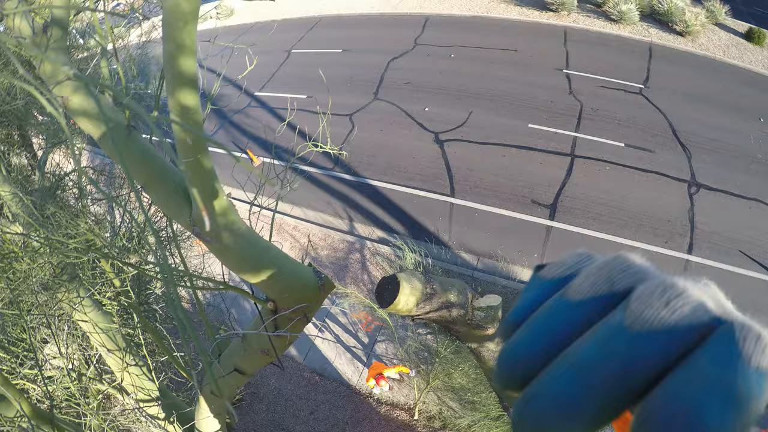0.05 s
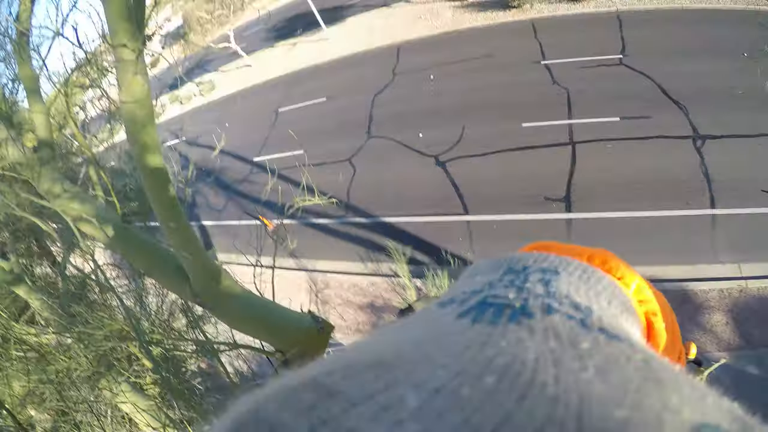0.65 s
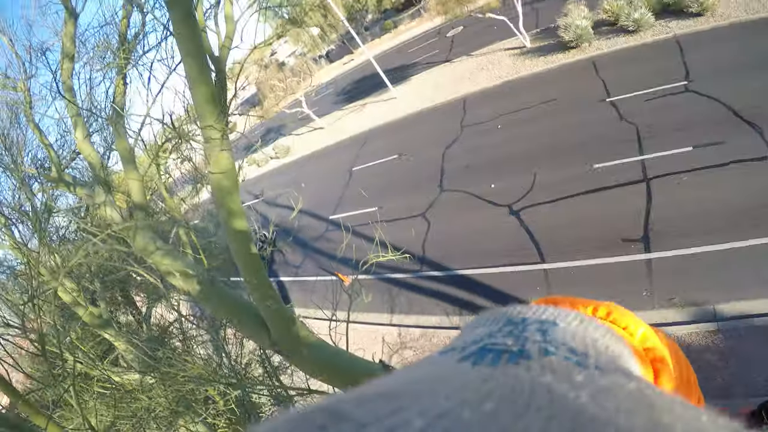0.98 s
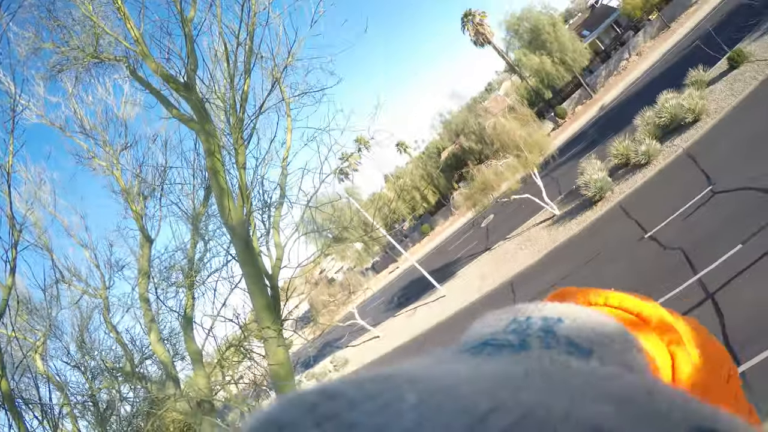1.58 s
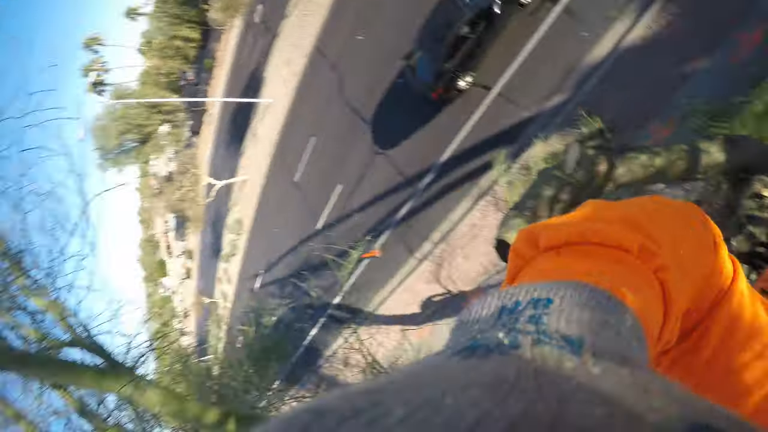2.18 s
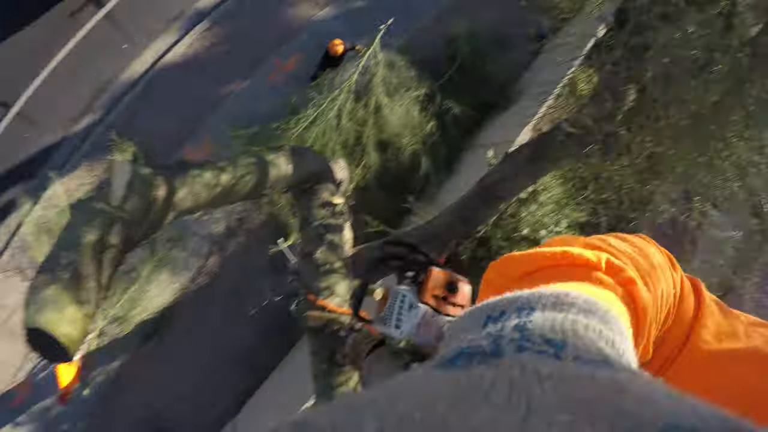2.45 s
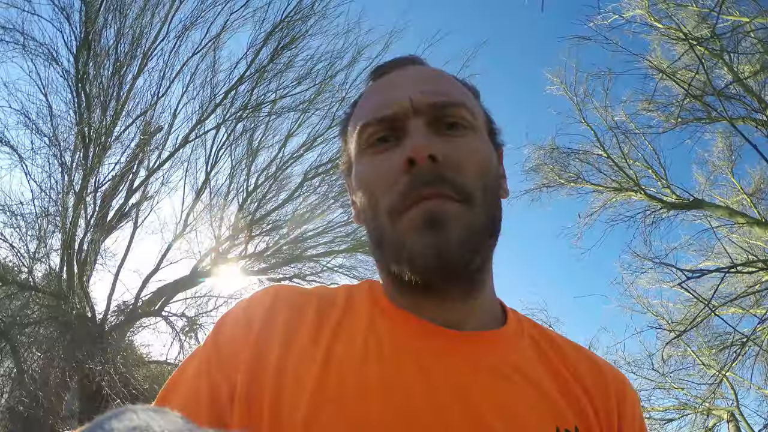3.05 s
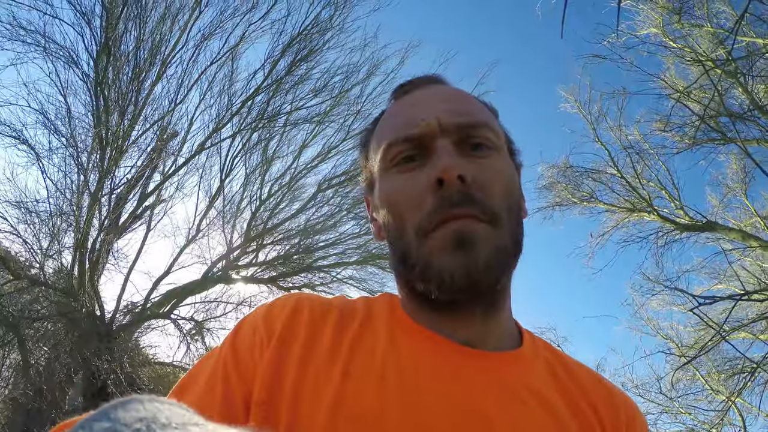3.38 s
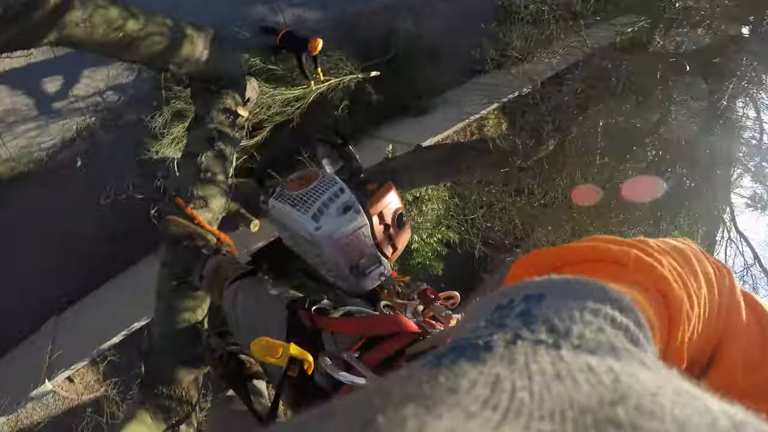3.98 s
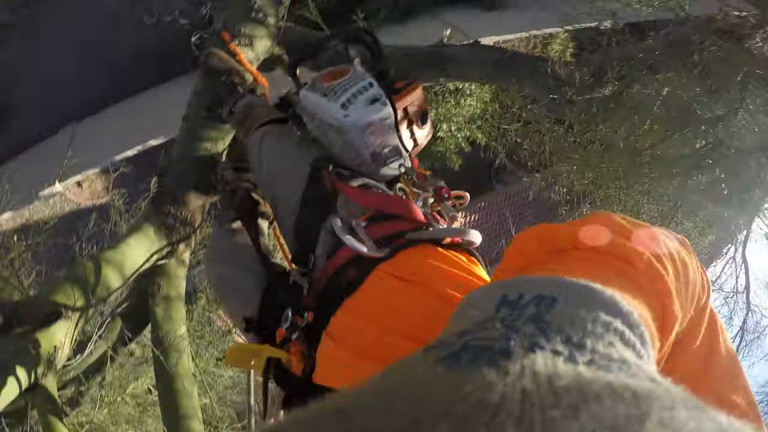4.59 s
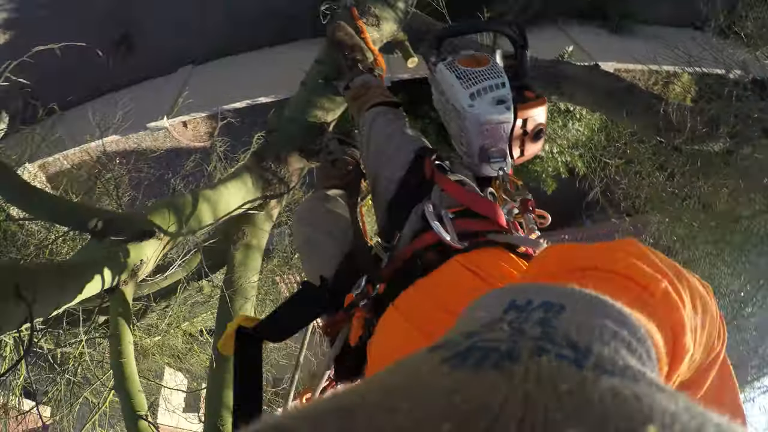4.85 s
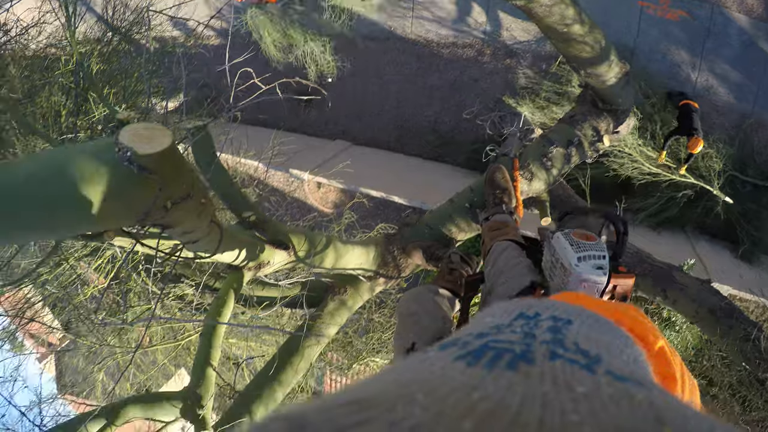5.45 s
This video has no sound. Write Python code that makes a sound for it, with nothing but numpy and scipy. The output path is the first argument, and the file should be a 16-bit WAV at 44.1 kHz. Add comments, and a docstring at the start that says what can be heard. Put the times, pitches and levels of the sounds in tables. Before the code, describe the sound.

Close handling noise from a handheld camera: a knit glove scrapes across the plastic housing amid irregular low bumps and small taps. A loud knock and short creak come midway, followed by scattered clicks, a quick zipping scuff with a swell of air, and one more strong thump. Soft cloth rustle and a building grip rumble finish it, all over faint outdoor traffic hum.

```python
"""A gloved hand turning a camera

High in a tree beside a road, a hand turns a small camera around. Bumps shake the mount and make it
thump and creak, the plastic housing clicks, and the knit glove rubs and zips over it. Clothes rustle,
air sways and distant traffic hums underneath. The hardest knocks overload the microphone."""
import sys
import numpy as np
from scipy import signal
from scipy.fft import rfft, irfft, next_fast_len
from scipy.io import wavfile
from scipy.ndimage import uniform_filter1d, map_coordinates

SR = 44100
rng = np.random.default_rng(int(sys.argv[2]) if len(sys.argv) > 2 else 0)


def unload_audio(sound):
    """Save the sound as a 16-bit wav file, at the path given as the first command line argument."""
    columns = np.transpose(np.atleast_2d(sound))
    # keep every value between -1 and 1, then stretch to whole-number steps
    steps = np.round(np.clip(columns, -1, 1) * 32767)
    wavfile.write(sys.argv[1], SR, steps.astype(np.int16))


N = 243431

# Soft bumps on the mount: t/s, level/dB, pitch of the push f/Hz, ringing relative to the push/dB
MOUNT_BUMPS = [(0.192, -9.5, 59, -24), (0.554, 0, 97.5, -2), (0.57, -6.5, 103, -4), (0.593, -9, 81, -30),
               (0.747, -17.5, 78.5, -9), (0.934, -12.5, 96, -1.5), (1.037, -12.5, 68, -12),
               (1.173, 0, 68.4, -7.5), (1.374, -7.5, 87, -3.5), (1.417, -1, 104, -10),
               (1.665, -6, 75, -11.5), (1.977, -11, 107, -8.5), (2.526, -9.5, 101, -5.5),
               (2.58, -15, 90, -5), (2.686, 4.5, 80.4, -11.5), (3.06, -13.5, 68.4, -19),
               (3.077, -11.5, 71.5, -7.5), (3.461, -23, 112, -8.5), (3.723, -8.5, 57.4, -37),
               (3.812, 1, 33, -38), (3.955, -16, 67.6, -5), (4.327, 2, 69, -11.5), (4.533, -18.5, 94, -6),
               (4.864, -25, 117, -3)]
# The tones the plastic housing rings at: f/Hz, level/dB, time to fade by 60 dB/s
HOUSING_TONES = [(356, -14.5, 0.021), (857, -10.5, 0.049), (970, 2, 0.01), (1270, -1, 0.0072),
                 (1300, -1, 0.034), (1767, -3.5, 0.031), (1969, -12, 0.054), (2277, -14, 0.053),
                 (2495, -6.5, 0.046), (2674, -1, 0.028), (2836, -8, 0.036), (3117, -7, 0.028),
                 (3784, -0.5, 0.02), (4050, -1.5, 0.022), (4684, -2, 0.036), (5080, 3.5, 0.02),
                 (5650, -2, 0.02), (6660, 0, 0.012), (7200, 10.5, 0.013), (9790, 24, 0.0026)]
# How briskly the arm carries the camera through the air: t/s, level/dB
ARM_MOTION = [(0.0, -43.5), (0.14, -45.5), (0.26, -35.5), (0.71, -26.5), (1.0, -38), (1.15, -43),
              (1.51, -29.5), (2.21, -36.5), (2.69, -30.5), (2.95, -32), (3.17, -45), (3.53, -42),
              (3.83, -19), (4.0, -41.5), (4.44, -32.5), (4.61, -42.5), (4.83, -43.5), (5.52, -34.5)]


def bumps():
    """Each bump is one swing of pressure, after which the mount rings briefly."""
    mount_hz, fade_s, lead_s = 108, .15, .05
    out = np.zeros(N)
    t = np.arange(SR // 4) / SR - lead_s
    after = np.maximum(t, 0)
    onset = 1 - np.exp(-(after / 0.0049) ** 2)
    ring = -np.cos(2 * np.pi * mount_hz * after) * amp(-60 * after / fade_s) * onset
    for start, db, push_hz, ring_db in MOUNT_BUMPS:
        push = -np.cos(2 * np.pi * push_hz * t) / np.cosh(t * push_hz / 0.39) ** 2.39
        add(out, start - lead_s, amp(db) * (push + amp(ring_db) * ring))
    return out


def clicks():
    """Each tap rings the housing's tones at new strengths; a soft tap leaves out the high ones."""
    # Taps on the housing, with a few faint buckle ticks among them (near 4.12, 5.10 and 5.31 s): t/s, relative
    # level/dB, treble limit f/Hz, tone of the touched spot f/Hz
    taps = [(0.177, -38, 900, 800), (0.263, -37.5, 4200, 3900), (0.378, -24, 1790, 860),
            (0.506, -32, 2600, 2600), (1.082, -23.5, 800, 800), (1.109, -14, 650, 950),
            (1.126, -29, 2580, 2780), (1.3984, -9, 1590, 930), (1.4022, -11.5, 1580, 1800),
            (1.454, -34.5, 4000, 4770), (1.968, -25, 730, 830), (2.3248, -18.5, 1870, 845),
            (2.4961, -21.5, 2140, 830), (2.531, -20.5, 1300, 1250), (2.542, -20.5, 1770, 2600),
            (2.6568, -19, 2900, 2290), (2.685, 1, 4040, 3060), (2.6872, -5, 2600, 2390),
            (2.6908, -8.5, 2550, 1330), (2.704, -11, 3500, 2350), (2.84, -23, 1300, 950),
            (2.876, -38, 9000, 7000), (2.8877, -18, 5870, 1670), (2.9212, -12.5, 2830, 1320),
            (3.1163, -9, 8600, 4000), (3.1174, -10.5, 2130, 2580), (3.129, -16, 4520, 2700),
            (3.139, -27, 3550, 2590), (3.264, -10.5, 8000, 1500), (3.2886, -16, 5500, 3870),
            (3.7092, -13.5, 3500, 1310), (3.7214, -13.5, 2800, 1820), (3.833, -22.5, 2300, 1820),
            (4.039, -36.5, 1200, 710), (4.0715, -30.5, 1400, 910), (4.092, -41, 4000, 2600),
            (4.1157, -44, 4900, 4600), (4.359, -29.5, 1820, 1300), (4.459, -19.5, 1870, 1420),
            (4.5135, -23, 1310, 1300), (4.8564, -31, 780, 400), (5.097, -45.5, 5000, 4800),
            (5.1376, -36, 840, 860), (5.2186, -25, 1690, 790), (5.313, -46, 5000, 4800),
            (5.3685, -32.5, 690, 930)]
    # Tone colour of the noisy crack: f/Hz, level/dB
    crack_colour = [(100, -33), (300, -12.5), (550, -11.5), (900, 1.5), (4000, 3), (9000, 0.5),
                    (15000, -12)]
    out, t = np.zeros(N), np.arange(SR // 10) / SR
    hz, tone_db, fade_s = np.transpose(HOUSING_TONES)[:, :, None]
    for start, db, hard_hz, spot_hz in taps:
        strength, detune, phase = rng.standard_normal((3, len(HOUSING_TONES), 1))
        tones = np.sin(2 * np.pi * hz * (1 + 0.011 * detune) * t + np.pi * phase)
        tones *= amp(tone_db + 2 * strength - 60 * t / fade_s)
        crack = coloured(rng.standard_normal(len(t)), crack_colour)
        crack *= amp(9 - 60 * t / 0.012) + amp(-2.5 - 60 * t / 0.055)  # a snap and a softer tail
        blow = (tones.sum(0) + crack) * (1 - np.exp(-t / 0.0004))
        softness = lambda f: 1 / (1 + 1j * f / hard_hz) ** 2 / (1 + (f / (3.4 * hard_hz)) ** 4)
        spot = lambda f: 1 + 2 / (1 + 1j * (f - spot_hz) / (0.16 * spot_hz))
        add(out, start, amp(db - 19) * unit(filtered(blow, lambda f: softness(f) * spot(f))))
    return out


def zips():
    """The ribs of the knit pluck an edge, mostly slowing as they go; the scuffing rings the housing."""
    # Slides over an edge: t/s, length/s, level/dB, first rib rate/Hz, last rib rate/Hz, roughness/0-1
    edge_slides = [(0.594, 0.06, -32, 3950, 3880, 0.35), (0.594, 0.062, -34.5, 5300, 5050, .6),
                   (0.711, 0.021, -32, 5200, 4750, 0.45), (0.718, 0.028, -25.5, 1272, 930, 0.45),
                   (2.495, 0.053, -35, 853, 916, 0.23), (2.72, 0.018, -38, 5050, 4980, 0.25),
                   (2.745, 0.064, -35.5, 3950, 3920, 0.3), (2.776, 0.008, -28, 4350, 4200, 0.2),
                   (3.704, 0.01, -29, 5200, 5000, 0.45), (3.72, 0.0153, -24, 3040, 1800, .8),
                   (3.786, 0.026, -25, 1650, 950, 0.7), (3.791, 0.018, -22, 5330, 4900, .7),
                   (3.8565, .0175, -13, 6000, 950, 0.1), (3.857, 0.013, -15, 4700, 3100, 0.8)]
    bite_s, stop_s = 0.003, 0.008
    out, size = np.zeros(N), SR // 8
    for start, length, db, first_hz, last_hz, rough in edge_slides:
        progress = np.minimum(np.arange(size) / SR / length, 1)
        rib_hz = last_hz + (first_hz - last_hz) * np.exp(-progress / 0.17)
        phase = 2 * np.pi * np.cumsum(rib_hz + 900 * rough * wobble(2500, size)) / SR
        ribs = through_housing(np.sin(phase) + 0.087 * np.sin(2 * phase), width_hz=70, direct=0.25)
        # A faster slide scuffs more brightly: f/Hz, level/dB
        scuff_colour = [(300, -24), (.5 * last_hz, -7), (last_hz, 0), (1.11 * last_hz, -3),
                        (2 * last_hz, -17), (5 * last_hz, -34)]
        scuff = coloured(rng.standard_normal(size), scuff_colour)
        scuff = through_housing(scuff, width_hz=20, direct=.02)
        ramps = np.minimum(progress / bite_s, (1 - progress) / stop_s) * length
        grip = np.sqrt(np.clip(ramps, 0, 1))
        add(out, start, amp(db) * grip * (np.sqrt(1 - rough ** 2) * ribs + rough * scuff))
    return out


def palm():
    """The palm shakes the mount and drags on the housing as it holds, squeezes and slips at each bump."""
    # Squeezes of the grip: t/s, length/s, drag level/dB, swell/dB, shaking relative to the drag/dB
    squeezes = [(0.874, 0.59, -40, 12.5, 15), (1.49, 0.19, -39.5, 3, 17.5), (1.832, 0.14, -36.5, 7.5, 9.5),
                (2.509, 0.02, -37, 1, 2.5), (2.568, 0.061, -43, 5, 10), (2.832, 0.031, -35, 5, 12),
                (2.926, 0.013, -52.5, -0.5, 29.5), (3.39, 0.1, -50, -20, 6.5),
                (3.695, 0.014, -28.5, -12, -2), (3.784, 0.274, -48, -3, 8), (4.335, 0.029, -42.5, -8, 17),
                (4.42, 0.047, -45, 5, 12.5), (4.503, 0.011, -33.5, 9, 10.5), (4.633, 0.02, -45, 0, 0),
                (5.34, 0.44, -46.5, 29.5, 24)]
    # Tone colours of the low shaking and the dull drag: f/Hz, level/dB
    shake_colour = [(25, -38.5), (50, 3), (85, -2.5), (120, -1.5), (150, -12), (200, -19.5), (300, -29.5),
                    (600, -133)]
    drag_colour = [(130, -2), (200, -6.5), (270, -2.5), (340, 6), (450, -0.5), (650, -2.5), (890, 6.5),
                   (1150, -17.5), (2000, -45), (6000, -76)]
    press = lambda rows: strokes(rows, attack_s=0.0096, release_s=0.11)
    slip_s, slip_lead_s = 0.025, 0.013
    hold = amp(curve(ARM_MOTION))
    slips = press([(start - slip_lead_s, slip_s, db, 0) for start, db, *_ in MOUNT_BUMPS])
    shakes = press([(start, length, db + shake_db, swell)
                    for start, length, db, swell, shake_db in squeezes])
    drags = press([row[:4] for row in squeezes])
    shake_gain = np.linalg.norm([amp(-6) * hold, shakes, amp(-23) * slips], axis=0)
    drag_gain = np.linalg.norm([amp(-23) * hold, drags, amp(-37) * slips], axis=0)
    shake = shake_gain * coloured(rng.standard_normal(N), shake_colour)
    drag = drag_gain * coloured(friction(grain_db=5.5, flutter_db=3.5), drag_colour)
    return shake + drag


def fingers():
    """Gloved fingers rub over the housing, and their fibres hiss."""
    # Slides of the glove: t/s, length/s, relative level/dB, swell/dB, offset for the hiss/dB
    slides = [(0.0, 0.24, -46, -6, -44.5), (0.174, 0.16, -50.5, -3, -1), (0.34, 0.35, -46.5, 8, 0),
              (0.514, 0.12, -35, 4.5, -5), (0.638, 0.05, -32, 3, -10.5), (0.702, 0.04, -25.5, 3, -21.5),
              (0.75, 0.135, -42.5, -2, -15), (0.888, 0.14, -40, 4, -16), (1.021, 0.34, -37, 0.5, -16),
              (1.371, 0.098, -28, -1.5, -22), (1.47, 0.069, -33.5, 12, -34), (1.524, 0.15, -34, 13, -18),
              (1.721, 0.08, -36, 2.5, -14.5), (1.813, 0.12, -46, -22, -29), (2.09, 0.054, -40, 6, -31),
              (2.467, 0.061, -35.5, 6.5, -28), (2.609, 0.12, -38.5, -9, -11), (2.686, 0.13, -39.5, 2, -7.5),
              (2.827, 0.13, -40, -14, -7.5), (3.017, 0.06, -43, 13.5, -9.5), (3.585, 0.24, -45.5, -7, -31),
              (3.692, 0.046, -37.5, 11, 0), (3.745, 0.072, -35, 8, -2), (3.826, 0.11, -31, -4, -5.5),
              (3.93, 0.04, -34.5, 10.5, -19), (4.01, 0.086, -46.5, -1, -11.5),
              (4.311, 0.038, -34.5, -1, -12.5), (4.396, 0.16, -47.5, 10, -12),
              (4.61, 0.74, -51.5, -11, -22)]
    # Tone colours of the rubbing, the hiss and the fizz: f/Hz, level/dB
    rub_colour = [(300, -18), (650, 1.5), (900, 2), (1300, 4.5), (1550, 2.5), (2200, -3.5), (2900, -8.5),
                  (3500, -8.5), (4200, -13.5), (7000, -24), (15000, -53.5)]
    hiss_colour = [(1000, 6), (2500, 11), (4000, 6), (5300, 6), (6200, 2.5), (7100, -2.5), (8300, -7),
                   (9700, -9), (12000, -14.5), (15000, -31.5)]
    fizz_colour = [(4000, -3.5), (8500, 8.5), (11500, 2.5), (14500, 0)]
    creep = amp(-16 + 0.83 * curve(ARM_MOTION))  # slight rubbing whenever the arm moves
    rub_gain = np.hypot(creep, strokes([row[:4] for row in slides]))
    hiss_gain = strokes([(start, length, db + hiss_db, swell)
                         for start, length, db, swell, hiss_db in slides])
    rubbing = through_housing(friction(grain_db=2, flutter_db=1.1), width_hz=50, direct=.1)
    fibres = through_housing(friction(grain_db=2, flutter_db=.8), width_hz=60, direct=.15)
    rub = amp(-6.5) * rub_gain * coloured(rubbing, rub_colour)
    hiss = amp(1) * hiss_gain * coloured(fibres, hiss_colour)
    # Fast strokes squeeze air through the knit: a fine fizz that grows faster than the hiss.
    fizz = amp(5.5) * hiss_gain ** 1.5 * coloured(friction(grain_db=3, flutter_db=1.5), fizz_colour)
    return rub + hiss + fizz


def creak():
    """After the hardest knock the mount sticks and slips unevenly; every slip rings the housing."""
    # Tone colour of the creak: f/Hz, level/dB
    creak_colour = [(700, -13), (1350, 4), (1550, 0.5), (2300, -1), (2650, -6), (3900, -2), (5200, -11),
                    (10000, -33.5)]
    slips_per_s, unevenness = 170, 0.8
    start, length, db, swell_db = 2.70, 0.108, -34.5, -5.5
    slip_count = np.cumsum(slips_per_s * np.exp(unevenness * wobble(150))) / SR
    slips = np.diff(np.floor(slip_count), prepend=0) * amp(3 * rng.standard_normal(N))
    t = np.arange(SR // 10) / SR
    ring = sum(amp(-60 * t / fade_s) * np.sin(2 * np.pi * (hz * t + rng.random())) / np.sqrt(fade_s)
               for hz, _, fade_s in HOUSING_TONES)
    rasp = coloured(signal.fftconvolve(slips, ring)[:N], creak_colour)
    return strokes([(start, length, db, swell_db)], release_s=0.053) * rasp


def weave():
    """The glove's taut weave draws steadily across the housing with a smooth, singing scrape."""
    # Steady scrapes: t/s, length/s, level/dB, swell/dB
    scrapes = [(0.33, 0.213, -49.5, 5), (0.99, 0.39, -48, 3)]
    # Tone colour of the scrape, a single band: f/Hz, level/dB
    scrape_colour = [(1900, -24), (2450, -3), (3100, -3.5), (3600, -10), (4600, -28.5)]
    scraping = through_housing(rng.standard_normal(N), width_hz=85, direct=.3)
    return strokes(scrapes) * coloured(scraping, scrape_colour)


def sleeve():
    """Light cloth brushes past with a thin, high swish."""
    # Passes of the sleeve: t/s, length/s, level/dB, swell/dB
    swishes = [(0.0, 0.34, -66, 1), (2.25, 0.22, -64, 9), (4.55, 0.41, -66, -6)]
    # Tone colour of the swish: f/Hz, level/dB
    swish_colour = [(2000, -26), (4500, 2), (6100, -2.5), (7500, -3), (9000, -2.5), (15500, -13.5)]
    return strokes(swishes) * coloured(friction(grain_db=2.5, flutter_db=2), swish_colour)


def clothes():
    """As the body turns, cloth and harness straps rustle in dense little grains of uneven size."""
    # Loudness of the rustle: t/s, level/dB
    rustle_levels = [(0, -67), (3.6, -70.5), (4.1, -64), (4.7, -59.5), (5.3, -68), (5.52, -70)]
    # Tone colour of the rustle: f/Hz, level/dB
    rustle_colour = [(1200, -25.5), (2500, -6), (3600, 2), (4800, 8), (6000, -3), (9000, -6.5),
                     (15000, -20.5)]
    grains_per_s, fade_s = 600, 0.017
    chance, size = rng.random(N), rng.exponential(size=N)
    grains = (chance < grains_per_s / SR) * amp(3.5 * np.minimum(size, 3))
    t = np.arange(SR // 50) / SR
    rustle = signal.fftconvolve(grains, amp(-60 * t / fade_s))[:N] * rng.standard_normal(N)
    return amp(curve(rustle_levels)) * coloured(rustle, rustle_colour)


def traffic():
    """Far tyres hum, and the hollow in front of the microphone adds a narrow band of noise."""
    # Tone colour of the tyres: f/Hz, level/dB
    tyre_colour = [(50, 21.5), (115, 6.5), (170, -15.5), (240, 4.5), (350, -5), (520, 4.5), (700, 4),
                   (1000, -8.5), (1300, -22), (1550, 0.5), (1850, 11), (3200, -54), (5500, -12.5),
                   (15000, -22.5)]
    hollow_hz, width_hz = 1290, 85
    tyres = coloured(rng.standard_normal(N), tyre_colour)
    resonance = lambda hz: 1 / (1 + 1j * (hz - hollow_hz) / width_hz) ** 2
    hollow = unit(filtered(rng.standard_normal(N), resonance))
    return amp(-54.5) * tyres + amp(-59) * hollow


def air():
    """Swaying air rumbles, louder when the arm moves briskly."""
    # Tone colour of the rumble: f/Hz, level/dB
    air_colour = [(8, 16.5), (20, 22), (38, 21.5), (60, 7), (115, 6), (160, -26.5), (250, -46.5)]
    return amp(curve(ARM_MOTION) + 2.5) * coloured(rng.standard_normal(N), air_colour)


def through_housing(x, width_hz, direct):
    """Rubbing stands out at the housing's tones; direct sets how much gets through between them."""
    def response(hz):
        power = direct
        for tone_hz, _, fade_s in HOUSING_TONES:
            damping_hz = np.log(1000) / (2 * np.pi * fade_s)  # quickly fading tones make broad peaks
            width = width_hz * np.sqrt(tone_hz / 1300) + damping_hz
            power = power + 1 / (1 + ((hz - tone_hz) / width) ** 2) ** 2
        return np.sqrt(power)
    return unit(filtered(x, response))


def friction(grain_db, flutter_db):
    """Fibres catch and let go in tiny grains; the colour shifts a little as the contact wanders."""
    spectrum = signal.stft(rng.standard_normal(N), nperseg=512)[2]
    patches = uniform_filter1d(rng.standard_normal(spectrum.shape), size=3, axis=0)  # smooth over pitch
    patches = unit(uniform_filter1d(patches, size=20, axis=1))  # and over time
    noise = signal.istft(spectrum * amp(1.5 * patches), nperseg=512)[1][:N]
    return noise * amp(grain_db * wobble(900) + flutter_db * wobble(60))


def strokes(rows, attack_s=0.0076, release_s=0.061):
    """Gain of strokes (t/s, length/s, level/dB, swell/dB): each takes hold, swells or sinks, lets go."""
    power, t = np.zeros(N), np.arange(SR) / SR
    for start, length, db, swell_db in rows:
        hold_db = db + swell_db * (np.minimum(t / length, 1) - .5)
        release_db = -60 * np.maximum(t - length, 0) / release_s
        add(power, start, (np.minimum(t / attack_s, 1) * amp(hold_db + release_db)) ** 2)
    return np.sqrt(power)


def amp(db):
    """Turn decibels into a gain to multiply by."""
    return 10 ** (np.asarray(db) / 20)


def unit(x):
    """Scale to an average strength (rms) of 1."""
    return x / np.sqrt(np.mean(x ** 2) + 1e-20)


def curve(rows):
    """Join (t/s, value) points with straight lines, one value per sample."""
    times, values = np.transpose(rows)
    return np.interp(np.arange(N) / SR, times, values)


def wobble(rate, size=N):
    """A curve that glides to a new random value rate times a second."""
    return map_coordinates(rng.standard_normal(size + 4), [np.arange(size) * rate / SR], order=1)


def filtered(x, response):
    """Multiply each frequency in x by response(hz)."""
    padded = next_fast_len(len(x) + 8192)
    hz = np.fft.rfftfreq(padded, 1 / SR)
    return irfft(rfft(x, padded) * response(hz), padded)[:len(x)]


def coloured(x, points):
    """Give x a tone colour of (f/Hz, level/dB) points and a strength of 1."""
    f, db = np.transpose(points)
    return unit(filtered(x, lambda hz: amp(np.interp(np.log(hz + 1), np.log(f), db))))


def add(track, start, sound):
    """Mix a sound into the track, start seconds in."""
    i = max(round(start * SR), 0)
    track[i:i + len(sound)] += sound[:N - i]


def scene():
    """All the sounds meet at the one microphone."""
    handling = bumps() + clicks() + zips() + creak() + palm() + fingers() + weave()
    return (handling + sleeve() + clothes() + traffic() + air())[None]


def record(dry):
    """The microphone rounds off the loudest peaks and cuts the highest treble."""
    ceiling, top_hz = .97, 15600
    rounded = dry[0] / (1 + np.abs(dry[0] / ceiling) ** 6) ** (1 / 6)
    return filtered(rounded, lambda hz: np.clip((top_hz - hz) / 500 + .5, 0, 1))[None]


dry = scene()
out = record(dry)
unload_audio(out)
```